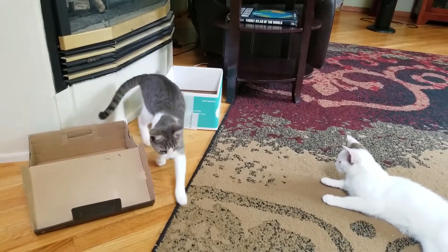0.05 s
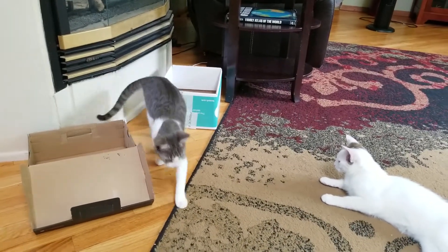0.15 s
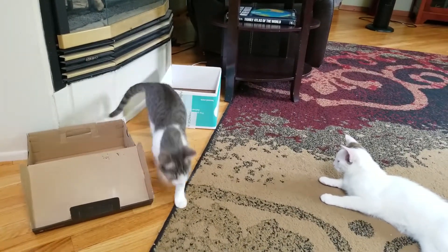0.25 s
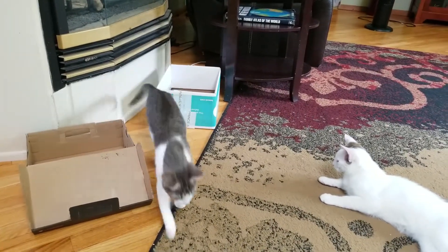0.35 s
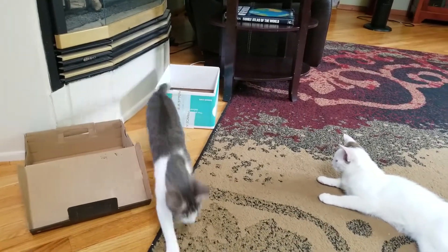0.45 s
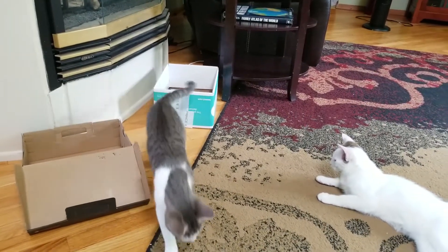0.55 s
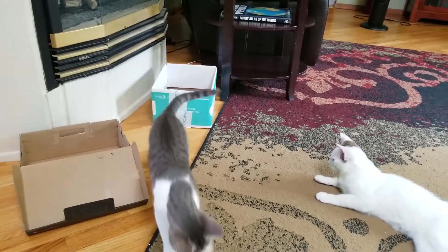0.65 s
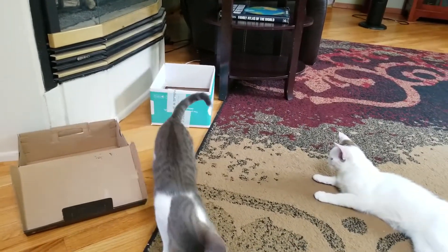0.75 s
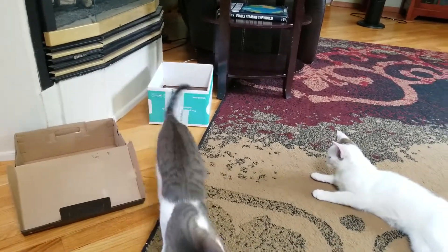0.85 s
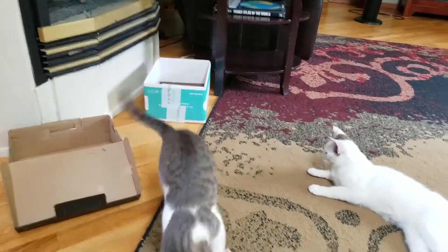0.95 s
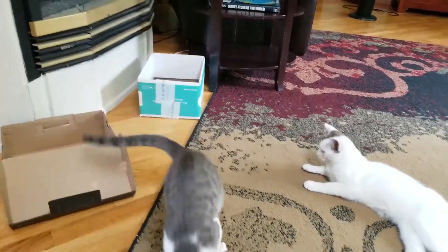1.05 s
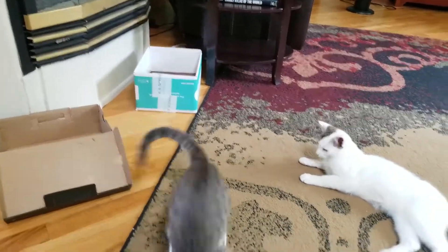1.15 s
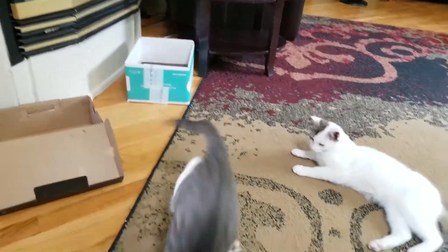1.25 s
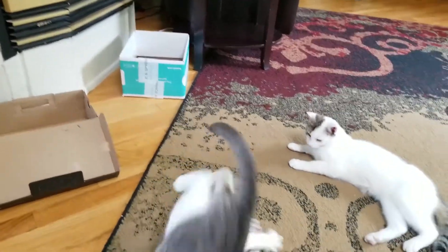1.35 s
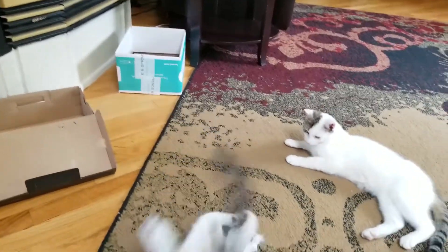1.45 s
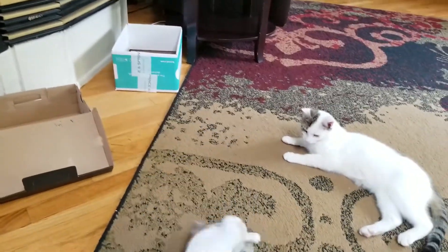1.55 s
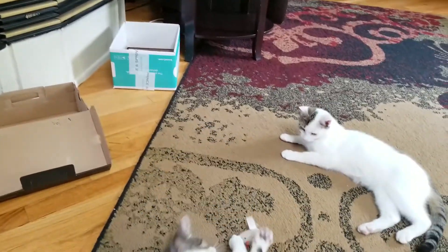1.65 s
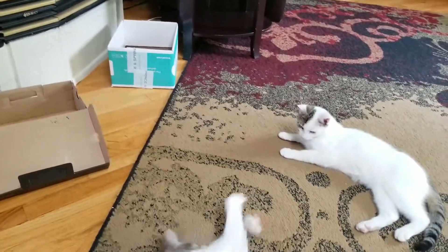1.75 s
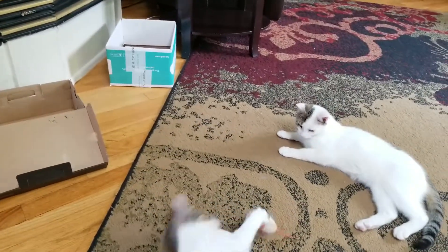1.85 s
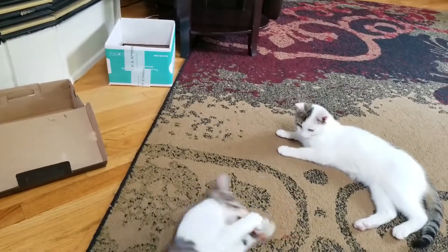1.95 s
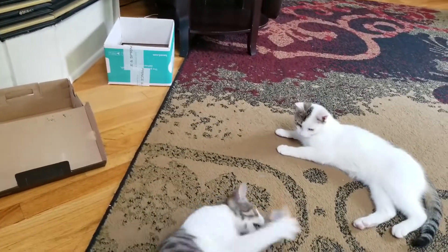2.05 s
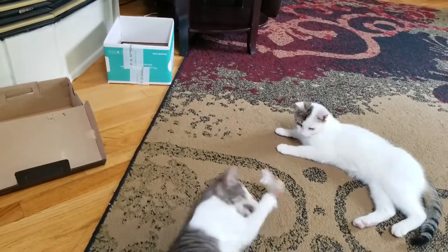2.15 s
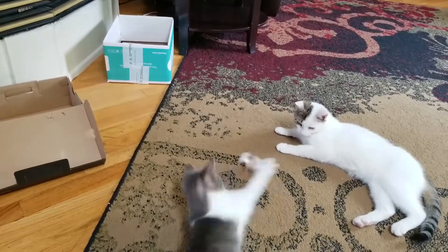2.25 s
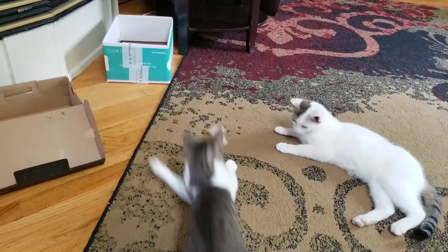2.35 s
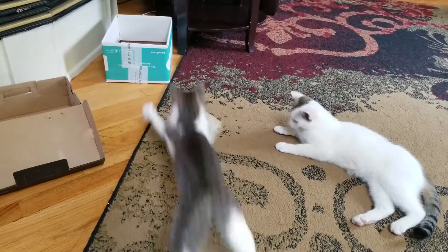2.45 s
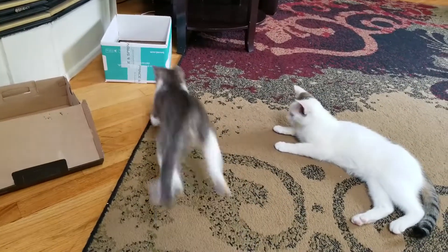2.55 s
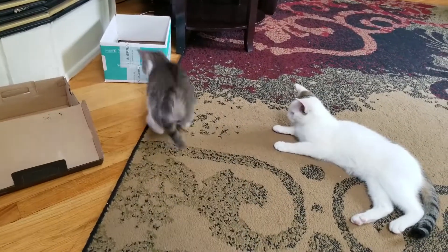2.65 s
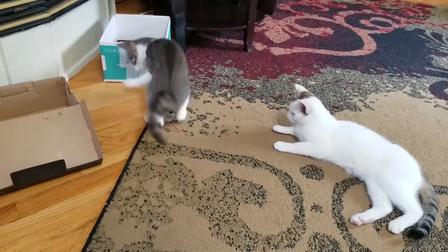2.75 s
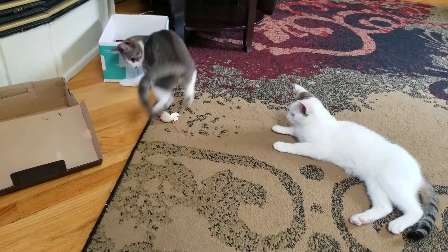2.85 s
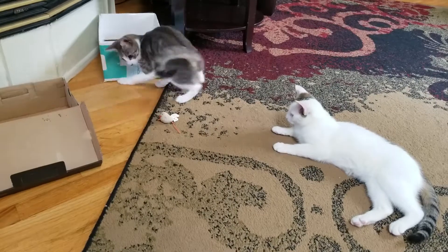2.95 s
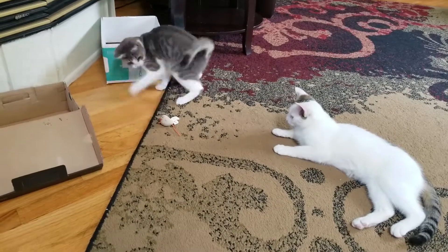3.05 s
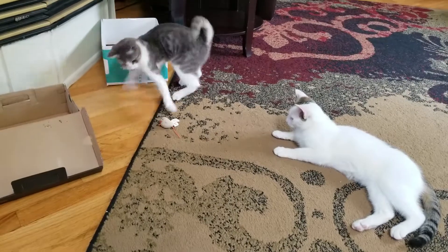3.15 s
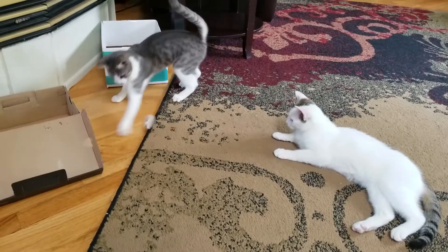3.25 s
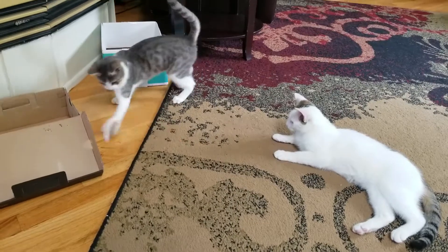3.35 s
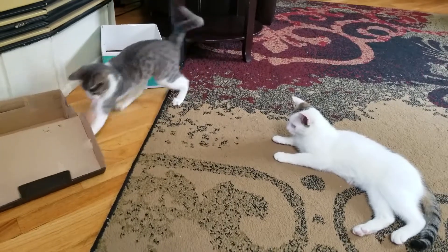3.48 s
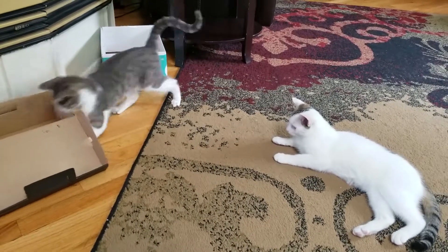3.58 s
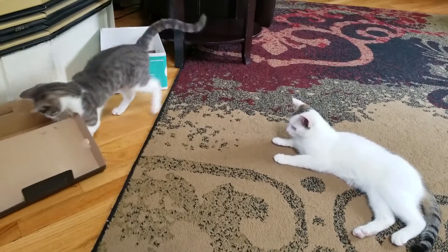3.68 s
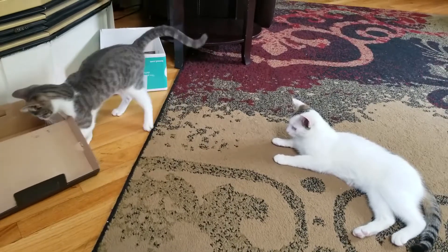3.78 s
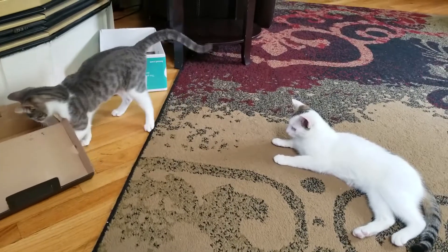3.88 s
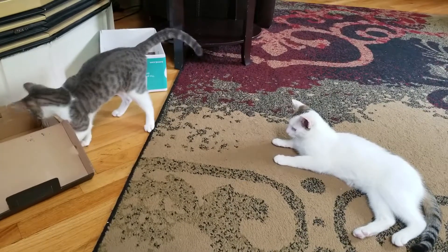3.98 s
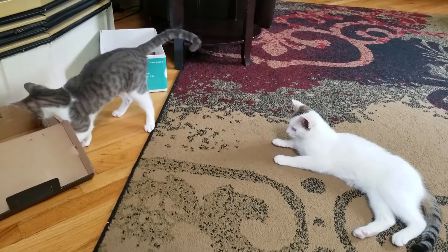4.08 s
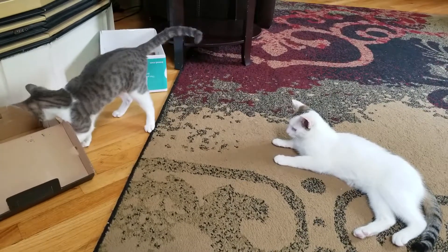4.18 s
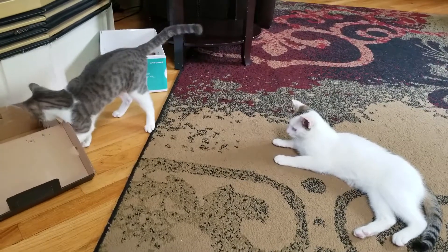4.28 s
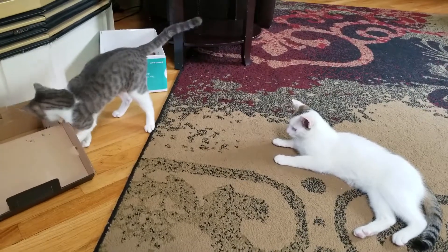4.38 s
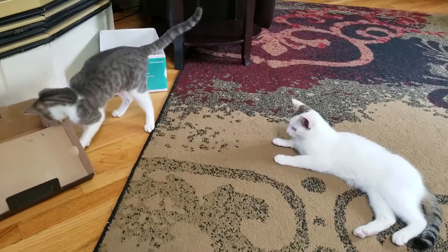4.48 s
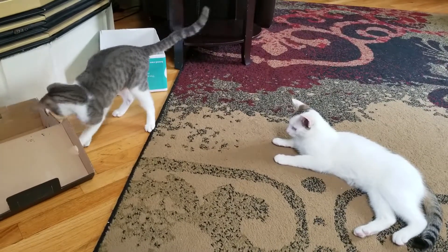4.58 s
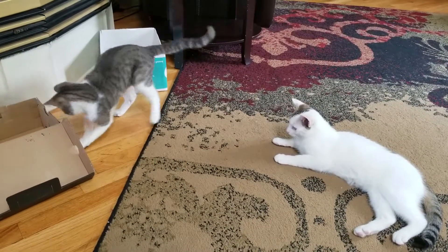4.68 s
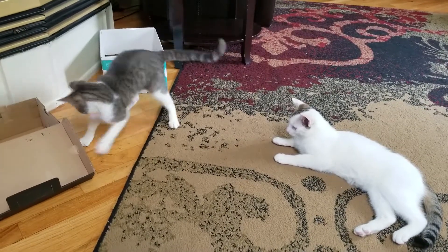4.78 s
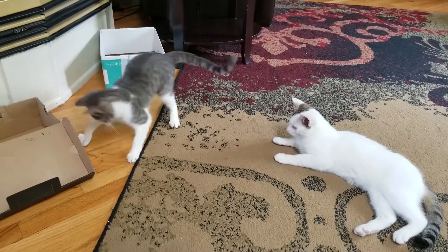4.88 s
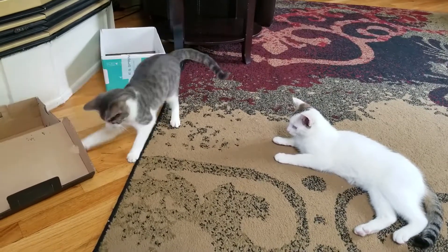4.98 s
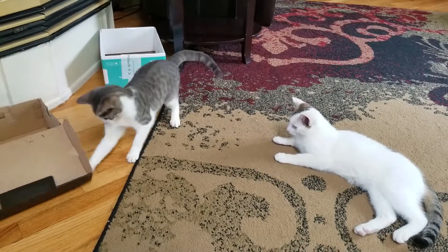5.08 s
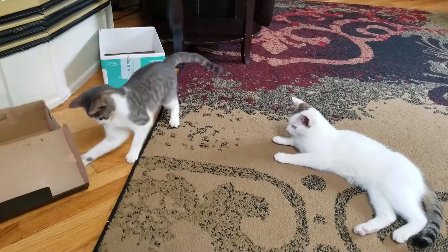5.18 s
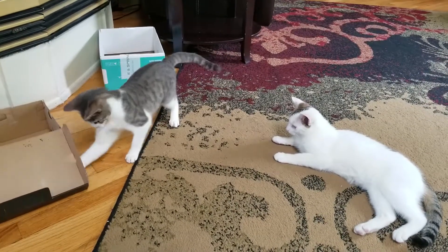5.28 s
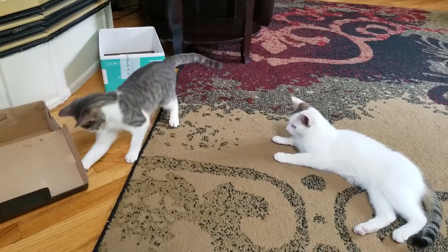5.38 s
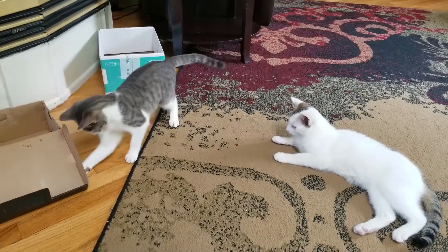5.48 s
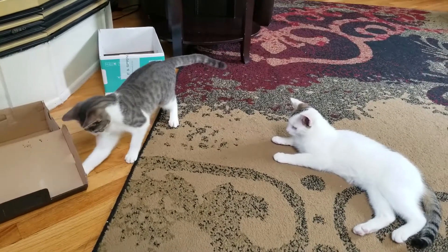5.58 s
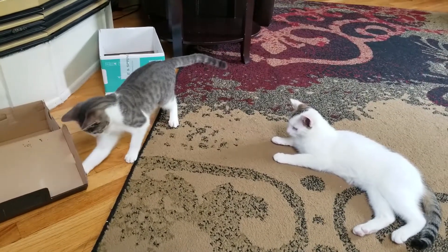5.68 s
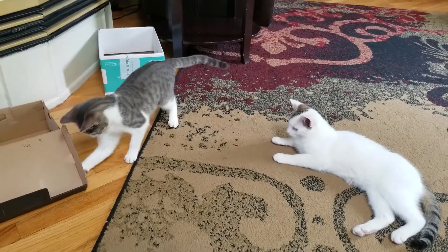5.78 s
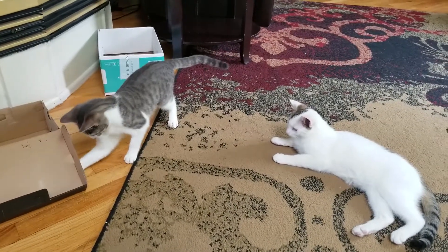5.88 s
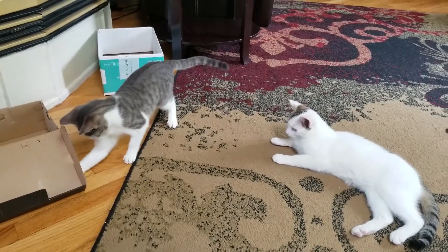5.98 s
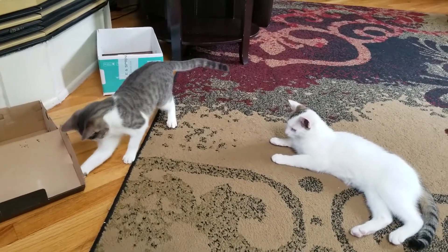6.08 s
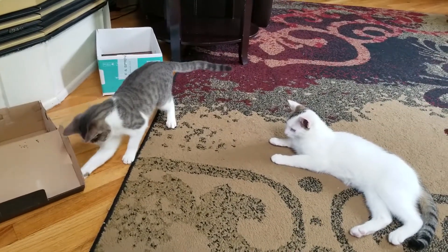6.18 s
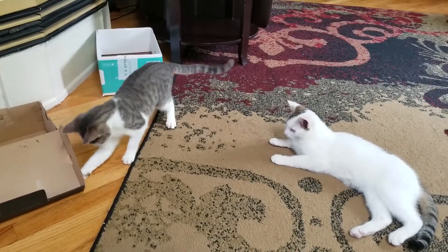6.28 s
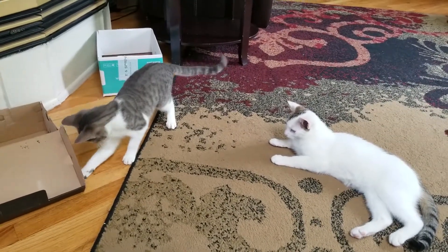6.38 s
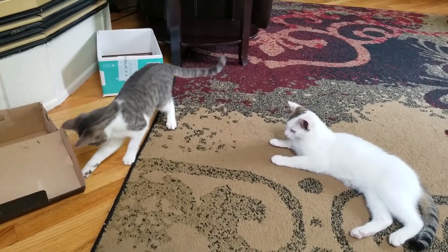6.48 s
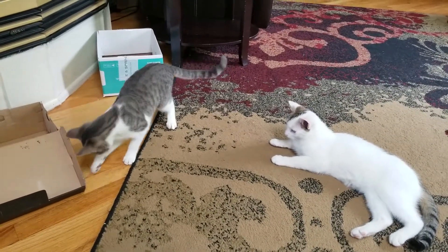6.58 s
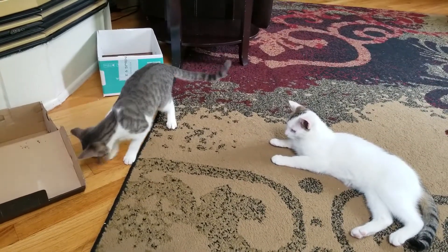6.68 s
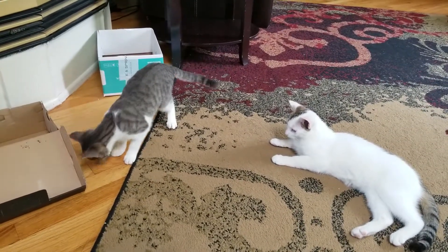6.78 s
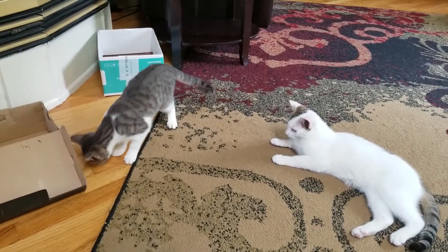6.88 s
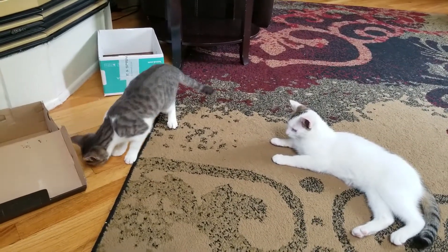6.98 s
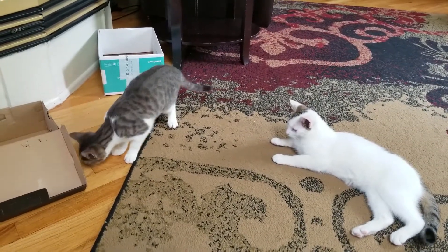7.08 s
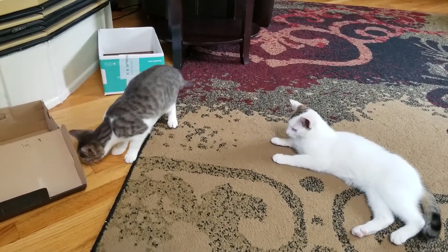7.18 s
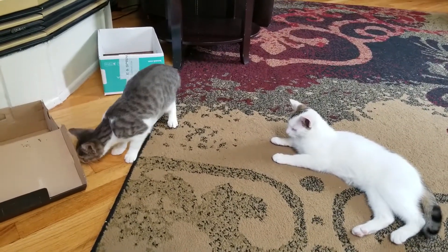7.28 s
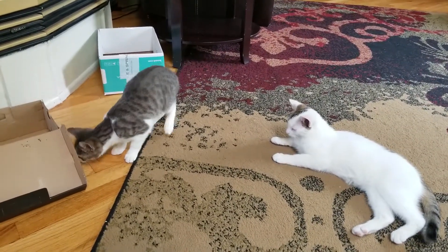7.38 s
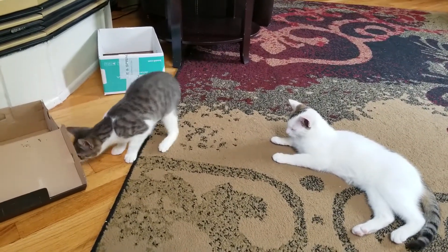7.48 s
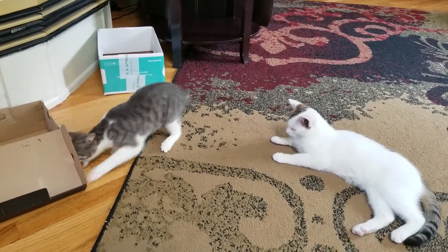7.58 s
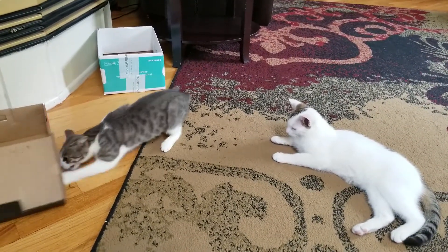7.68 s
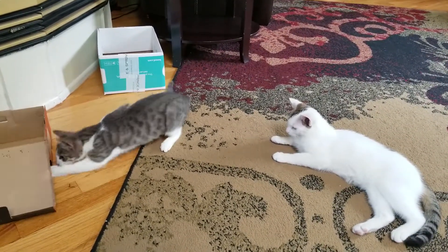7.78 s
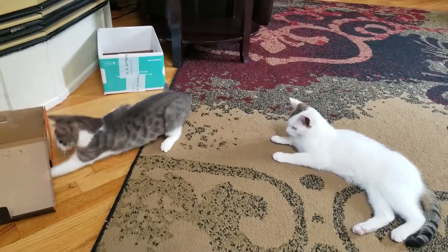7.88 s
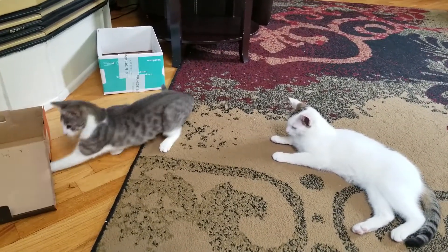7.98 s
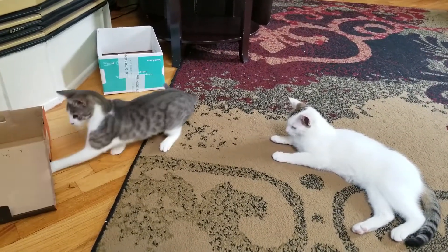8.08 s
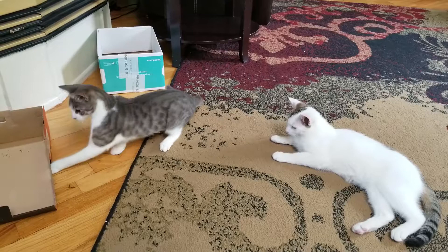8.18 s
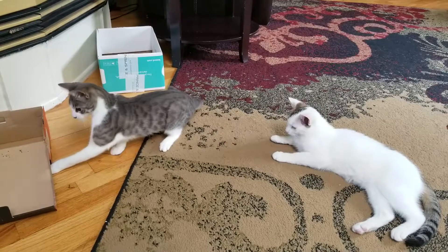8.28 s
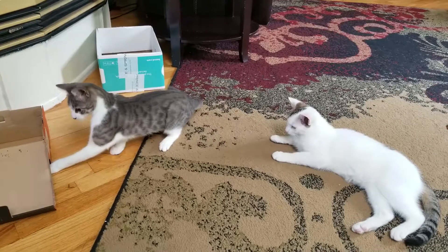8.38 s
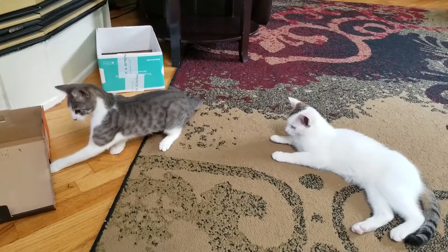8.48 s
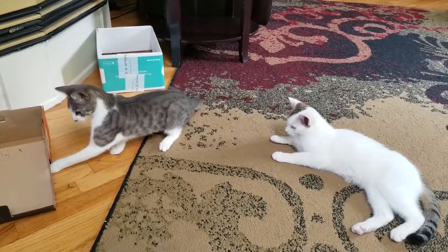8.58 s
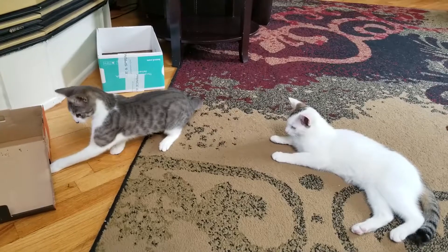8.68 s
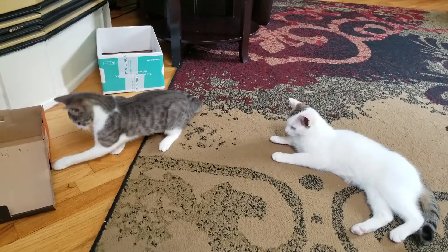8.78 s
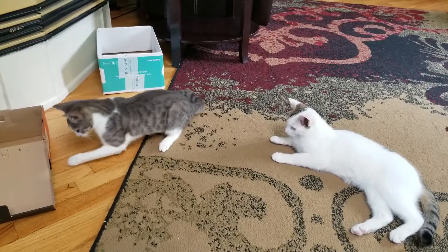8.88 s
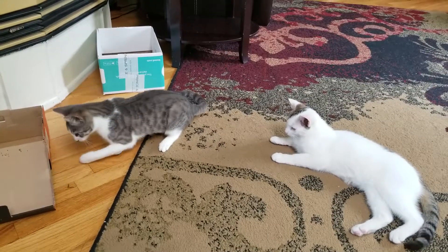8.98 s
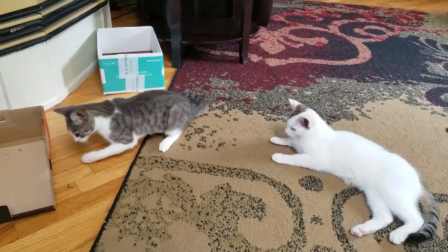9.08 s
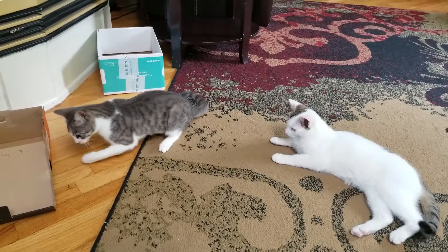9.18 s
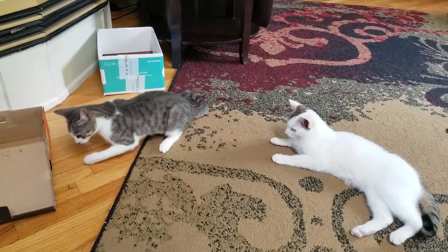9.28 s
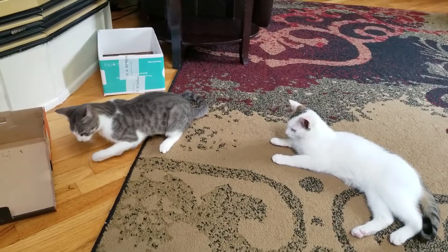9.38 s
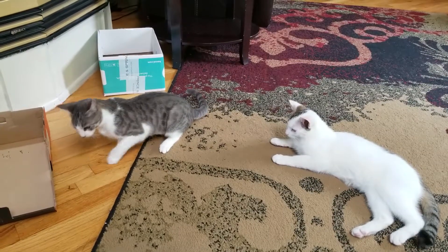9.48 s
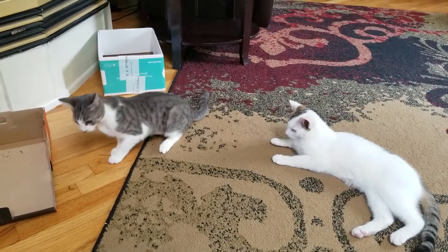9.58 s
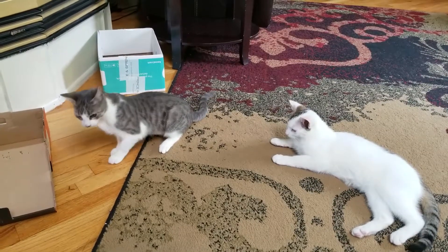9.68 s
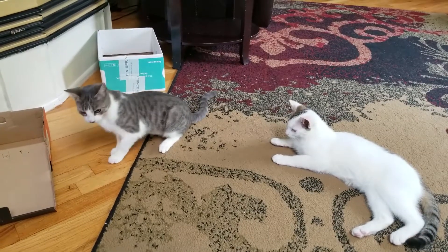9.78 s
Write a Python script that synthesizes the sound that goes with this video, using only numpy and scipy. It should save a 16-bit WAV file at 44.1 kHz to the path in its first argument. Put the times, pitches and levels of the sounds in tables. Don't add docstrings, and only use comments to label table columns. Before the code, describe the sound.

A quiet living room with low steady ventilation hum and thin hiss, picked up in stereo from a few steps away. Almost nothing happens until about 1 s, when light claw ticks and soft rug thumps begin; around 1.6 s a small tumble gives dull taps, flicked cardboard and muffled scuffing. Faint ticks and thumps follow at 2.1 to 2.6 s. At 2.8 to 3.1 s a claw snap, quick paw thuds on boards and a grainy slide. At 3.5 s a loud sharp swat hits a hollow cardboard box, slightly left. Then a lull, with a faint rapid bird trill outside from 4.7 to 6.3 s. Small scrapes near 5 s lead to the loudest swat at 5.2 s, with hollow knocks fading until 5.7 s. Quiet until 7.6 s, when crisp snaps, a rim knock and scuffs cluster to 7.9 s; only hum and a barely audible tap or tick remain until nearly 10 s.

```python
import sys
import numpy as np
from scipy import signal
from scipy.fft import rfft, irfft, next_fast_len
from scipy.io import wavfile
from scipy.ndimage import uniform_filter1d

SR = 44100
rng = np.random.default_rng(int(sys.argv[2]) if len(sys.argv) > 2 else 0)


def undo_db(level):
    steps = np.asarray(level, float) / 20
    return 10 ** steps


def persist_wave(psi):
    counts = np.round(np.clip(psi, -1, 1) * 32767).astype(np.int16)
    wavfile.write(sys.argv[1], SR, np.atleast_2d(counts).T)


N = 433803
TOP_HZ = 15850


def unit(x):
    return x / np.sqrt(np.mean(x ** 2) + 1e-20)


def along(points, hz):
    f, value = np.transpose(points)
    return np.interp(np.log(hz + 1), np.log(f + 1), value)


def filtered(x, response):
    size = next_fast_len(x.shape[-1] + 8192)
    spectrum = rfft(x, size) * response(np.fft.rfftfreq(size, 1 / SR))
    return irfft(spectrum, size)[..., :x.shape[-1]]


def resonance(centre_hz, width_hz):
    return lambda f: 1j * f * width_hz / (centre_hz ** 2 - f * f + 1j * f * width_hz)


def causal(points):
    def response(hz):
        cepstrum = irfft(np.log(undo_db(along(points, hz))))
        cepstrum[1:len(hz) - 1] *= 2
        cepstrum[len(hz):] = 0
        return np.exp(rfft(cepstrum))
    return response


def paired(two, alike):
    turn = lambda hz: np.arccos(np.clip(along(alike, hz), -1, 1)) / 2
    mid, side = filtered(two, lambda hz: np.array([np.cos(turn(hz)), np.sin(turn(hz))]))
    return np.array([mid + side, mid - side])


def rush(spectrum, alike, patchy_db, grain_db):
    z = signal.stft(rng.standard_normal((2, N + 512)), nperseg=512)[2]
    patches = uniform_filter1d(rng.standard_normal(z.shape[1:]), size=6, axis=0)
    patches = uniform_filter1d(patches, size=10, axis=1)
    pair = signal.istft(z * undo_db(patchy_db * unit(patches)), nperseg=512)[1][:, :N]
    grain = undo_db(grain_db * unit(uniform_filter1d(rng.standard_normal(N), size=90)))
    coloured = filtered(pair * grain, lambda hz: undo_db(along(spectrum, hz)))
    return unit(paired(coloured, alike))


# (f/Hz, t60/s)
ROOM_DECAY = [(100, 0.32), (500, 0.55), (2000, 0.65), (5000, 0.59), (9000, 0.55), (15000, 0.31)]
# (f/Hz, left-right likeness)
ROOM_ALIKE = [(60, .9), (130, 0.88), (290, 0.91), (640, -0.052), (1100, -.3), (2000, -0.1), (4000, -0.018),
              (8000, .1)]


def diffuse():
    noise = filtered(paired(rng.standard_normal((2, 2 * SR)), ROOM_ALIKE), lambda hz: hz < TOP_HZ)

    def share(hz):
        centres = [centre for centre, _ in ROOM_DECAY]
        return np.array([along([(f, f == centre) for f in centres], hz) for centre in centres])[:, None]

    t = np.arange(SR * 9 // 16) / SR
    fall = np.array([undo_db(-60 * t / t60) for _, t60 in ROOM_DECAY])
    return filtered(noise, share), fall * np.minimum(t / 0.0046, 1) ** 2


# (t/s, lead of the left port/ms)
LEFT_LEAD = [
    (0, .02),
    (3.2, .02),
    (3.4, .33),
    (9.84, .34),
]


def heard(track, room, s, sound, wet_db, pan_db, spread=None, lead_share=0.98):
    bands, fall = room
    start = rng.integers(bands.shape[-1] - fall.shape[1])
    tail = np.einsum("bct,bt->ct", bands[..., start:start + fall.shape[1]], fall)
    tail = tail / np.linalg.norm(tail[0])
    spread = sound if spread is None else spread
    both = undo_db(wet_db) * signal.fftconvolve(spread[None], tail, axes=1)
    lead = round(lead_share * np.interp(s, *np.transpose(LEFT_LEAD)) * SR / 1000)
    both[0, :len(sound)] += sound * undo_db(pan_db / 2)
    both[1, lead:lead + len(sound)] += sound * undo_db(-pan_db / 2)
    at = round(s * SR)
    both = both[:, :N - at]
    track[:, at:at + both.shape[1]] += both


# (t/s, level/dB)
AIR_FLOW = [
    (0, -53),
    (2.5, -51),
    (4.2, -52),
    (6.5, -53),
    (9.84, -53),
]
# (f/Hz, level/dB per Hz)
HUM_COLOUR = [(12, -61.5), (20, -35), (27, -31), (48, -9.5), (65, -5.5), (86, -13), (122, -2.5), (145, -11),
              (174, -0.5), (209, -5.5), (239, -0.5), (293, -1.5), (383, -13), (592, -13.5), (1100, -29),
              (1430, -63.5), (2420, -120)]
# (f/Hz, level/dB per Hz)
VENT_HISS_COLOUR = [(530, -26), (900, -22.5), (1040, -1.5), (1550, -0.5), (1880, -4.5), (2420, -5),
                    (3070, -8), (4310, -3), (4980, -9.5), (6330, -10.5), (8450, -18.5), (14400, -15.5),
                    (16000, -16)]
# (f/Hz, left-right likeness)
AIR_ALIKE = [(25, .55), (60, 0.85), (130, 0.96), (290, 0.95), (640, 0.54), (1410, -0.13), (3100, 0.02),
             (6820, -0.02), (15000, -0.28)]


def air():
    flow_db = np.interp(np.arange(N) / SR, *np.transpose(AIR_FLOW), -140, -140)
    hum = rush(HUM_COLOUR, AIR_ALIKE, patchy_db=1, grain_db=0)
    hiss = rush(VENT_HISS_COLOUR, AIR_ALIKE, patchy_db=.5, grain_db=0)
    return undo_db(flow_db + 0.96) * hum + undo_db(flow_db - 17 + 1.34) * hiss


# (t/s, level/dB)
BIRD_SWELL = [
    (4.67, -62.5),
    (5, -56.5),
    (5.5, -53.5),
    (5.9, -55.5),
    (6.25, -62.5),
]


def bird(room):
    track, t = np.zeros((2, N)), np.arange(SR // 20) / SR
    part = np.clip(t / .045, 0, 1)
    shape = np.sin(np.pi * part ** .6) * undo_db(-2 * part)
    for s in 4.66 + .0787 * np.arange(21):
        pitch, size = rng.standard_normal(2)
        hz = (6450 - 2500 * part ** 1.1) * (1 + .012 * pitch)
        level_db = np.interp(s, *np.transpose(BIRD_SWELL)) + .8 * size - 1.0
        note = undo_db(level_db) * shape * np.sin(2 * np.pi * np.cumsum(hz) / SR)
        heard(track, room, s, note, wet_db=4.5, pan_db=-1.5)
    return track


# (t/s, hold/s, scuff level/dB, hiss level/dB, fade/dB per s)
STROKES = [(0.946, 0.018, -59.5, -83, 120), (1.09, .01, -55, -65, 92), (1.25, .3, -59, -84, 100),
           (1.57, 0.34, -51, -73.5, 65), (2.128, .01, -58, -70, 70), (2.285, .01, -63, -81, 110),
           (2.622, 0.146, -62, -90.5, 200), (2.8, .06, -43, -56.5, 200), (2.848, 0.15, -33.5, -51.5, 105),
           (3.43, .04, -47.5, -62, 200), (3.47, .03, -42.5, -60, 100), (3.623, 0.21, -53, -68, 70),
           (4.962, .01, -38, -71, 110), (5.018, .01, -42, -58.5, 112.5), (5.091, 0.0056, -45, -54.5, 199),
           (5.19, .03, -50, -61, 50), (7.62, .005, -31, -57.5, 120), (7.642, 0.1, -50, -62.5, 110),
           (7.843, 0.05, -57, -65, 45)]


def strokes():
    t = np.arange(0, N + 32, 32) / SR
    s, hold, scuff_db, hiss_db, fade = np.transpose(STROKES)[..., None]
    rising = 2999.5 * np.maximum(s - t, 0)
    fading = fade * np.maximum(t - s - hold, 0)
    levels = (scuff_db - rising - fading, hiss_db - rising - 1.4 * fading)
    return [np.interp(np.arange(N) / SR, t, db.max(axis=0)) for db in levels]


# (f/Hz, level/dB per Hz)
SCUFF_COLOUR = [(180, -24), (300, -6.5), (434, -23.5), (473, -5.5), (937, -17.5), (1180, -14.5),
                (7370, -21.5), (9000, -40), (11700, -72), (19800, -120)]
# (f/Hz, level/dB per Hz)
SCUFF_HISS_COLOUR = [(5000, -40), (8500, -2.5), (9300, -10.5), (11500, -2.5), (14100, -0.5), (16000, -9)]


def scuffs():
    body_db, hiss_db = strokes()
    body = rush(SCUFF_COLOUR, ROOM_ALIKE, patchy_db=.8, grain_db=2)
    hiss = rush(SCUFF_HISS_COLOUR, [(9000, .1)], patchy_db=.8, grain_db=2.2)
    return undo_db(body_db - 7.0) * body + undo_db(hiss_db + 2.5) * hiss * undo_db([[1.5], [-1.5]])


# (t/s, peak level/dB, floor f/Hz, t60/s)
BOARD_THUMPS = [(2.783, -28.5, 196.6, 0.12), (2.843, -25.5, 184, 0.038), (2.937, -21.5, 193, .11),
                (3.007, -20.5, 198.3, 0.079), (3.012, -34.5, 114, 0.086), (3.075, -47, 170, 0.082),
                (3.456, -29, 236, .059), (3.498, -27, 248, 0.1), (3.511, -46, 90, 0.15),
                (4.321, -55, 275, .1), (4.868, -44, 236, .1), (5.019, -39, 155, 0.12),
                (5.184, -26, 252, 0.13), (5.187, -39.5, 101.3, .11), (5.446, -39, 275, 0.027),
                (5.6, -48, 90, 0.057), (7.611, -38, 208, .14), (7.749, -33, 213, 0.05),
                (7.917, -30.5, 222, 0.041), (8.136, -57, 256, .14)]
# (t/s, peak level/dB, floor f/Hz)
RUG_THUMPS = [(.299, -46, 75.4), (0.968, -47.5, 95), (1.089, -40.5, 92), (1.455, -37, 95.6),
              (1.488, -45, 114), (1.561, -31.5, 133), (1.581, -29, 138), (1.605, -31.5, 155),
              (1.686, -39.5, 133), (1.742, -37.5, 186), (2.279, -38, 154), (2.317, -45.5, 109),
              (2.513, -39.5, 126), (2.649, -41, 125)]


def paws(room):
    track, t = np.zeros((2, N)), np.arange(SR // 6) / SR
    rug_cycles = 12.7
    rug = [(s, db, hz, rug_cycles / hz) for s, db, hz in RUG_THUMPS]
    for s, db, hz, t60 in [*BOARD_THUMPS, *rug]:
        wave = lambda k: np.sin(2 * np.pi * k * hz * t)
        decay = undo_db(-60 * t / t60)
        swing = wave(0.95) + .3 * wave(.58)
        swing = swing + decay * (0.78 * wave(1.55) + .4 * wave(2.6))
        swing = swing * decay * (1 - np.exp(-t / .0025)) ** 2
        thump = undo_db(db) * swing / np.abs(swing).max()
        heard(track, room, s, thump, wet_db=-4.5, pan_db=1.3, lead_share=0.49)
    return track


# (multiple of the main panel's f, level/dB)
PANELS = [(1.004, -6), (1.17, -9), (1.34, -12), (2.101, -10), (2.7, -10), (3.9, -10.5)]
# (t/s, peak level/dB, t60/s, contact/ms)
BOTTOM_KNOCKS = [(1.593, -25.5, 0.028, 0.43), (3.01, -32.5, .055, 0.76), (3.436, -40, .055, 1.8),
                 (3.488, -22, 0.094, 1.8), (3.516, -29.5, .06, 2.3), (5.072, -33.5, .032, 0.96),
                 (5.1842, -10.5, 0.063, 1.06), (5.236, -22.5, 0.034, 2.2), (5.287, -32, 0.092, 1.8),
                 (5.445, -29, 0.14, 2), (5.653, -34, 0.041, 2.1), (5.68, -48.5, 0.094, 2.2),
                 (7.611, -29.5, 0.068, 1.5)]
# (t/s, peak level/dB, contact/ms)
RIM_KNOCKS = [
    (1.562, -29.5, 0.41),
    (2.284, -43.5, 1.5),
    (2.783, -34, .53),
    (3.467, -28.5, 2.1),
    (5.02, -30, 1.126),
    (7.678, -20.5, 0.97),
]
# (t/s, peak level/dB, t60/s)
FLAP_KNOCKS = [
    (1.603, -26, 0.028),
    (2.848, -28.5, 0.11),
    (2.94, -33, .14),
    (7.92, -42.5, 0.092),
]


def box(room):
    track, t = np.zeros((2, N)), np.arange(SR // 6) / SR
    softer_db = 6.5
    # (t/s, peak level/dB, main panel f/Hz, t60/s, contact/ms, room level/dB)
    blows = [(s, db, 535.6, t60, contact, -6) for s, db, t60, contact in BOTTOM_KNOCKS]
    blows += [(s, db, 601, 0.051, contact, -5) for s, db, contact in RIM_KNOCKS]
    blows += [(s, db, 494.4, t60, 0.7, -8) for s, db, t60 in FLAP_KNOCKS]
    for s, db, hz, t60, contact, wet_db in blows:
        ring = np.zeros(len(t))
        for k, level in PANELS:
            panel_db = level - softer_db * contact * (k - 1) - 60 * k ** 0.82 * t / t60
            ring += undo_db(panel_db) * np.sin(2 * np.pi * k * hz * t)
        ring = ring * (1 - np.exp(-t / (.001 * contact))) ** 2
        knock = undo_db(db) * ring / np.abs(ring).max()
        heard(track, room, s, knock, wet_db, pan_db=2.2, lead_share=.3)
    return track


# (t/s, peak
# level/dB, centre f/Hz, width over centre, room level/dB)
SNAPS = [(1.5631, -44.5, 3300, 0.88, 11), (1.595, -37, 3500, 0.92, -5), (2.7808, -19, 2480, 0.75, 8),
         (3.013, -49, 1400, 1.4, 5), (3.43, -44, 3060, 1.3, 9), (3.457, -37, 2040, 0.49, 13.5),
         (5.2329, -19.5, 2410, 0.31, -1), (5.278, -27.5, 2090, 0.31, 3.5), (3.5025, -19.5, 7610, .6, 2),
         (7.611, -20.5, 1740, 0.48, 9.5), (7.6139, -15.5, 3250, .25, -2), (7.6798, -25, 1900, .9, 6.5),
         (7.8347, -29, 4300, 0.27, 8)]
# (t/s, peak level/dB, centre f/Hz, width over centre, room level/dB)
WALL_SNAPS = [
    (3.502, -6.5, 3640, 0.87, 2.5),
    (4.66, -38.5, 3120, .65, 7.5),
    (4.9626, -31, 3160, .2, 7.5),
    (5.092, -43.5, 4350, 0.78, 11),
    (5.1839, -5, 2210, 0.97, 3),
    (7.6058, -18.5, 4620, 0.12, 0),
    (7.821, -16, 4140, 0.84, 2.5),
]
# (t/s, peak level/dB, centre f/Hz, room level/dB)
TICKS = [
    (1.0868, -40, 6250, -1),
    (1.4652, -41.5, 5500, -3),
    (1.375, -56, 3000, -9),
    (1.6876, -39, 5000, 0),
    (1.78, -41, 2980, 1.5),
    (2.1266, -47, 6000, 3),
    (2.2845, -48, 4600, 7.5),
    (8.7194, -51.5, 4150, 1.5),
]
# (t/s, peak level/dB, centre f/Hz, room level/dB)
TAPS = [
    (1.233, -50.5, 1400, -5),
    (1.563, -33.5, 800, 7),
    (1.593, -30.5, 805, -1.5),
    (1.772, -42.5, 900, 5),
    (2.518, -54, 900, 4),
    (4.66, -44.5, 802, 5),
    (7.921, -34.5, 1300, 2.5),
    (8.292, -50.5, 895, -7.5),
]


def claws(room):
    track, t = np.zeros((2, N)), np.arange(SR // 25) / SR
    impulse = 1. * (t == 0)
    contacts = [(*row, -12.5) for row in SNAPS] + [(*row, 3.5) for row in WALL_SNAPS]
    for rows, width in ((TICKS, 0.95), (TAPS, 0.69)):
        contacts += [(s, db, hz, width, wet_db, -25) for s, db, hz, wet_db in rows]
    for s, db, hz, width, wet_db, echo_db in contacts:
        body = lambda f: resonance(hz, width * hz)(f) * 1j * f / (1j * f + 0.31 * hz)
        colour = lambda f: body(f) + undo_db(-16.5) * 1j * f / (1j * f + 4000)
        force = rng.standard_normal(len(t)) * undo_db(-60 * t / .016) + 2.5 * impulse
        snap = filtered(force, colour)
        snap = undo_db(db + 2) * snap / np.abs(snap).max()
        echo = filtered(np.roll(snap, round(0.0072 * SR)), resonance(3100, 1300))
        smooth = filtered(impulse, lambda f: colour(f) / (1 + 1j * f / 5500))
        smooth = smooth * np.linalg.norm(snap) / np.linalg.norm(smooth)
        spread = .95 * smooth + .25 * snap
        direct = undo_db(2.5) * (snap + undo_db(echo_db) * echo)
        heard(track, room, s, direct, wet_db, pan_db=5.8, spread=spread)
    return track


# (f/Hz, level/dB)
MICROPHONE = [(1000, 2), (7000, -7), (8300, -9.5), (9200, -23), (11000, -14.5), (15000, -11.5),
              (16500, -17.5), (17100, -72)]


def scene():
    room = diffuse()
    steady = air() * undo_db([[.4], [-.4]]) + scuffs()
    steady = filtered(steady, lambda hz: hz < TOP_HZ)
    struck = bird(room) + paws(room) + box(room) + claws(room)
    return steady + filtered(struck, causal(MICROPHONE))


def band_limit(x):
    return signal.sosfilt(signal.butter(12, 17050, fs=SR, output="sos"), x)


def record(dry):
    return band_limit(dry)


dry = scene()
out = record(dry)
persist_wave(out)
```